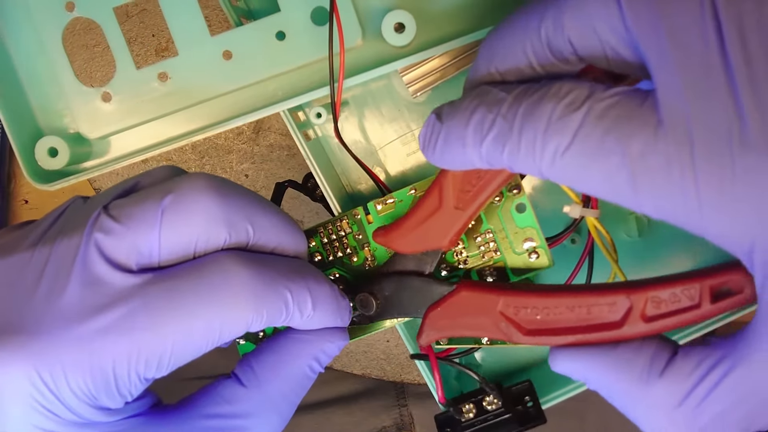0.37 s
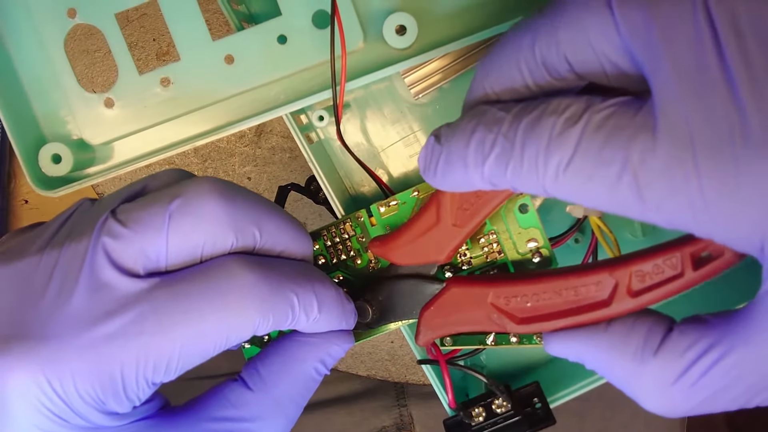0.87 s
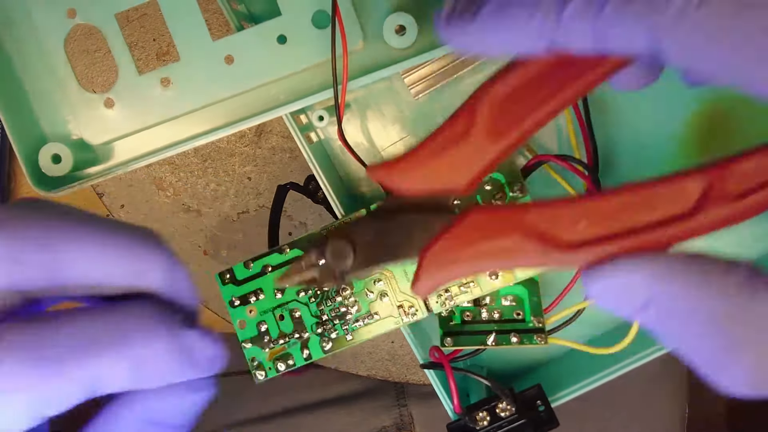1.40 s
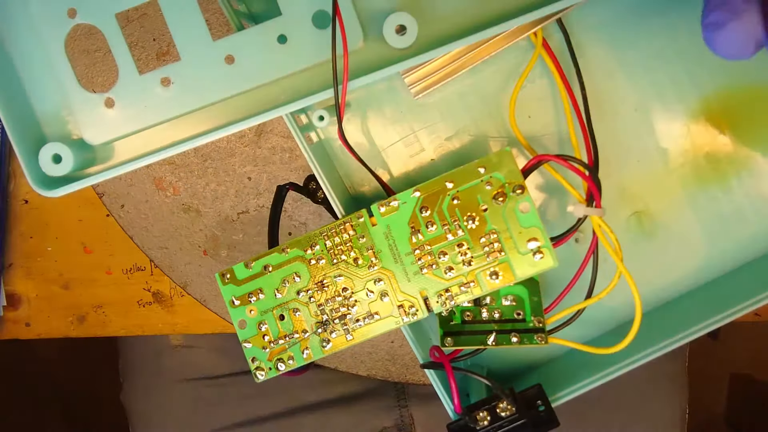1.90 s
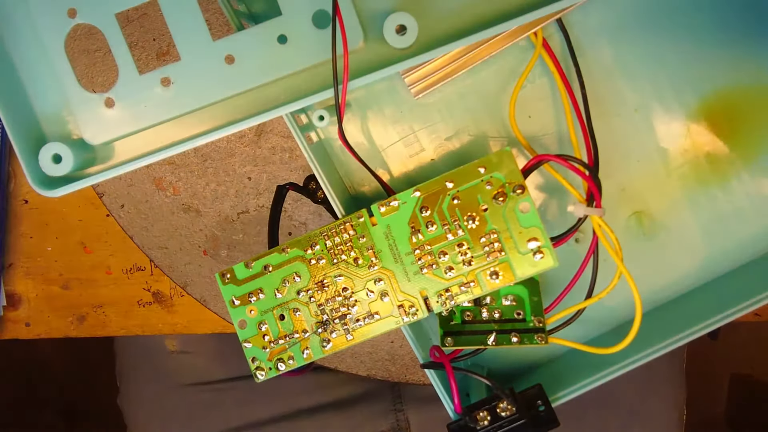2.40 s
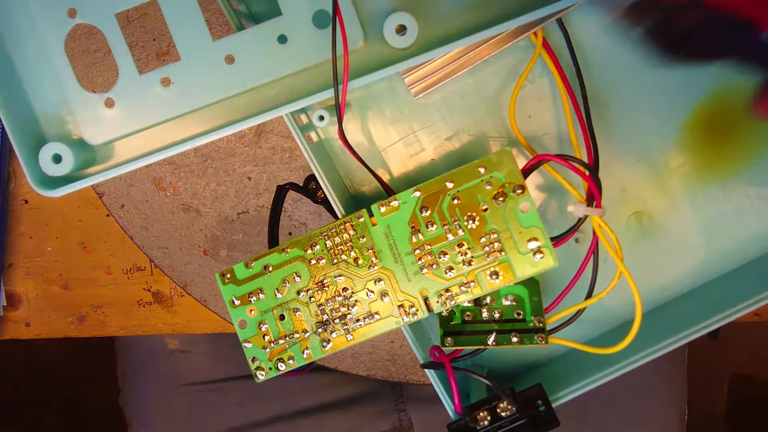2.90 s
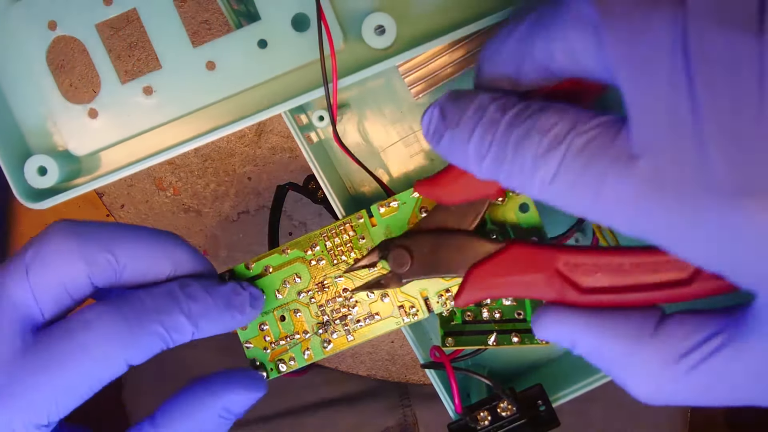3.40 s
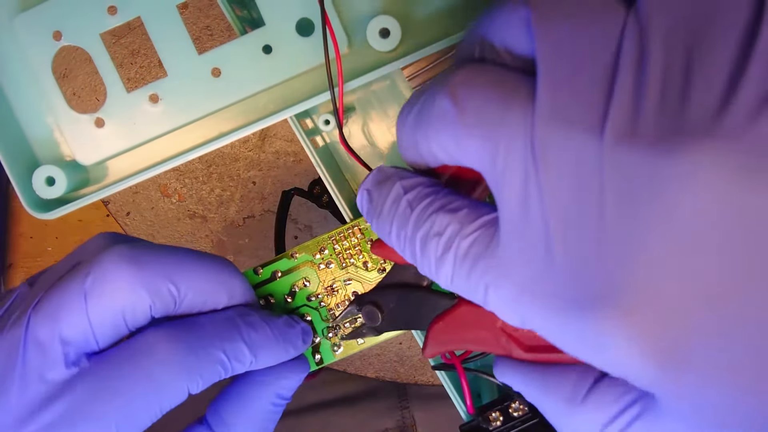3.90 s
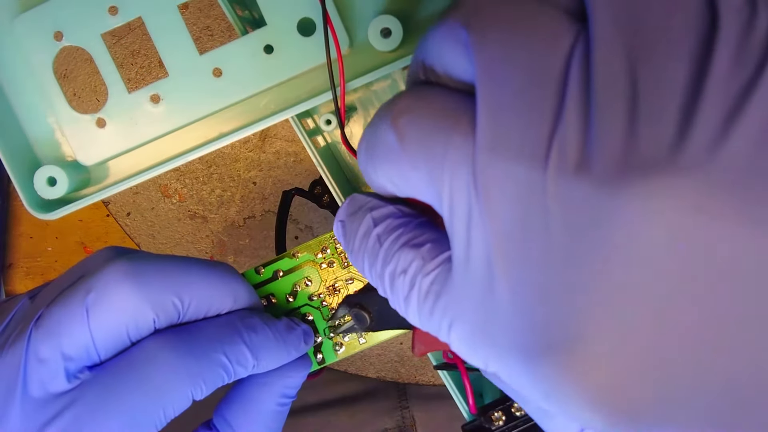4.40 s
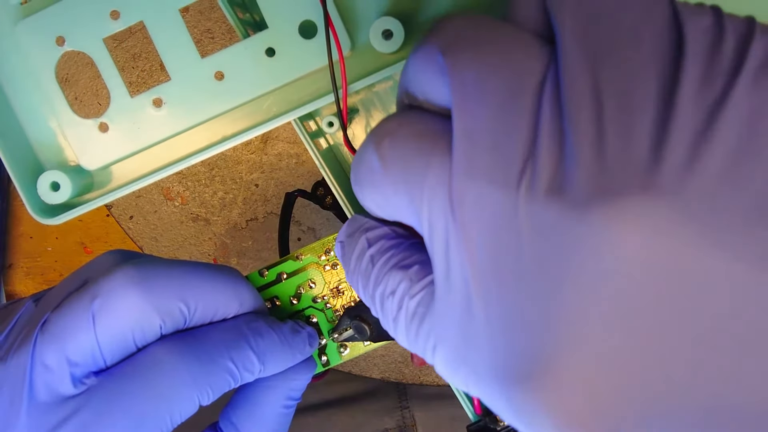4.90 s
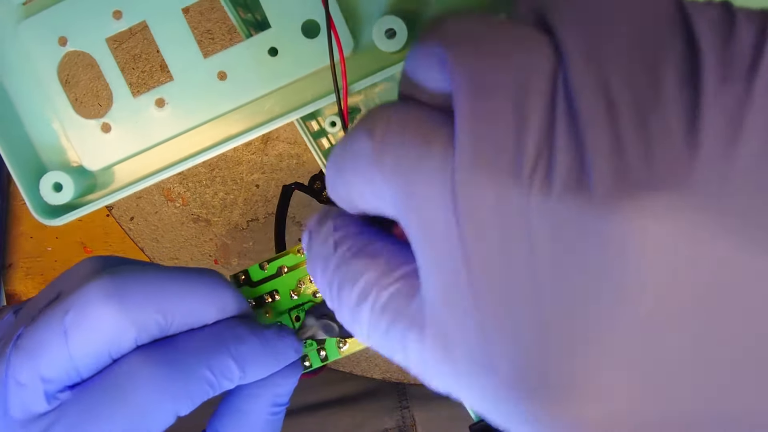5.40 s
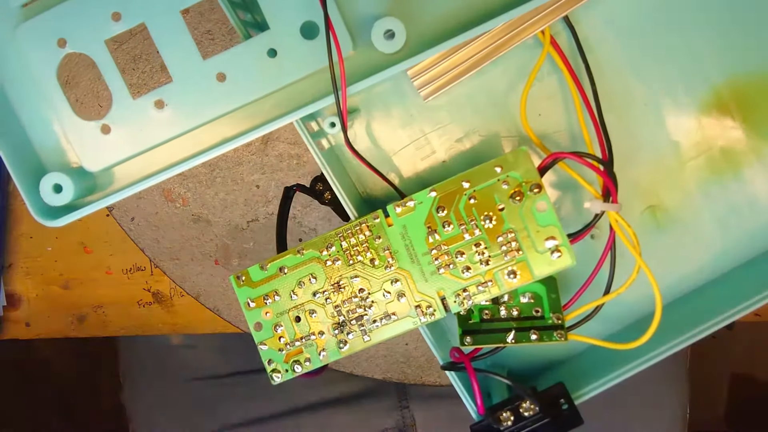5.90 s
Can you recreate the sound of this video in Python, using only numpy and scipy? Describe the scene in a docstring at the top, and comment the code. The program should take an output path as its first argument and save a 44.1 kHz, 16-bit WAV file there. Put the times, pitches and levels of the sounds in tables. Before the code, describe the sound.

Close workbench handling: sharp metallic snips, hollow plastic knocks, tiny ticks, a short stuttering drag with a squeak, then quiet before one last bright snip.

```python
"""Snipping wire leads on a circuit board

Small steel cutters snip wire leads on a circuit board lying in a plastic tray on a workbench. Each snip
or tap is a burst of noise that cracks and rings resonant modes of jaws, tray and bench, with a room echo.
Ticks, short friction, rustle and scuffing are shaped noise; a dragged object judders once in uneven slips.
The microphone mount sways in slow sines over bench rumble; behind lie still air, low hum and high tones."""
import sys
import numpy as np
from scipy import signal
from scipy.fft import rfft, irfft, next_fast_len
from scipy.io import wavfile
from scipy.ndimage import uniform_filter1d, map_coordinates

SR = 44100
rng = np.random.default_rng(int(sys.argv[2]) if len(sys.argv) > 2 else 0)


def decibels_to_gain(level_db):
    """Convert a level in decibels to a linear amplitude gain (20 dB per decade)."""
    exponent = np.asarray(level_db, float) / 20
    return 10 ** exponent


def inscribe(sig):
    """Save sig as 16-bit PCM at rate SR to the path in sys.argv[1].

    A 1-D sig is mono; a 2-D sig holds one channel per row.
    Samples are clipped to [-1, 1] before scaling.
    """
    pcm = np.round(np.clip(np.atleast_2d(sig).T, -1, 1) * 32767)
    wavfile.write(sys.argv[1], SR, pcm.astype(np.int16))


N = 266408  # samples


def unit(x):
    """Scales to rms 1."""
    return x / np.sqrt(np.mean(x ** 2) + 1e-20)


def peak(x):
    """Scales so that the loudest 12 ms have rms 1."""
    power = uniform_filter1d(np.mean(x ** 2, axis=0), size=512)
    return x / np.sqrt(power.max())


def along(points, hz):
    """Reads a curve of (Hz, value) points on a log frequency axis."""
    f, v = np.transpose(points)
    return np.interp(np.log(hz + 1), np.log(f + 1), v, right=v[-1])


def curves(rows):
    """Draws one value per sample for each column after the time."""
    s, *cols = np.transpose(rows)
    return [np.interp(np.arange(N) / SR, s, c) for c in cols]


def wobble(rate):
    """A smooth random curve with rate knots a second."""
    knots = rng.standard_normal(int(N * rate / SR) + 4)
    return map_coordinates(knots, [np.arange(N) * rate / SR])


def swell(s, db, rise, hold, fade_db_per_s):
    """A gain that rises from the moment s, holds and fades; rise and hold in seconds."""
    t = np.arange(N) / SR - s
    fade_db = fade_db_per_s * (t - rise - hold).clip(0)
    return decibels_to_gain(db - fade_db) * np.clip(t / rise, 0, 1) ** 2


def filtered(x, response):
    """Multiplies the spectrum of x by a complex response of frequency."""
    n = x.shape[-1]
    m = next_fast_len(n + 8192)  # padding lets the response die away
    return irfft(rfft(x, m) * response(np.fft.rfftfreq(m, 1 / SR)), m)[..., :n]


def soft(hz, edge_hz):
    """Response of a causal low-pass of four poles."""
    return 1 / (1 + 1j * hz / edge_hz) ** 4


def octave_band(hz, centre_hz, octaves):
    """Response of a bell-shaped band on a log frequency axis."""
    return np.exp(-.5 * (np.log2((hz + 1) / centre_hz) / octaves) ** 2)


def resonant(x, modes, scatter_db=0):
    """x rings a set of (Hz, width Hz, dB) modes of alternating sign, each at a slightly new strength."""
    gains = decibels_to_gain(scatter_db * rng.standard_normal(len(modes)))

    def response(f):
        total = 0
        for k, (c, w, db) in enumerate(modes):
            mode = 1j * f * w / (c * c - f * f + 1j * f * w)
            total = total + (-1) ** k * gains[k] * decibels_to_gain(db) * mode
        return total
    return filtered(x, response)


def rush(spectrum, alike, grainy_db=0):
    """Stereo noise of rms 1, partly alike at both microphones; quick random swells make it grainy."""
    common, own = rng.standard_normal(N), rng.standard_normal((2, N))
    pair = np.sqrt(alike) * common + np.sqrt(1 - alike) * own
    grains = decibels_to_gain(grainy_db * wobble(240))
    return unit(filtered(pair * grains, lambda hz: decibels_to_gain(along(spectrum, hz))))


def chatter(t, rise, t60, alike):
    """A contact is a short rattle of noise, partly the same at both microphones."""
    z = rng.standard_normal((3, len(t)))
    pair = np.sqrt(alike) * z[0] + np.sqrt(1 - alike) * z[1:]
    return pair * (1 - np.exp(-t / rise)) * decibels_to_gain(-60 * t / t60)


def echo(x):
    """The room's answer dies at its own speed in each band; a new noise tail each time."""
    # room decay: pitch_hz, t60_s
    room = [(200, 0.19), (1000, 0.14), (5000, 0.17), (14000, 0.23)]
    hz, t, z = signal.stft(rng.standard_normal((2, SR // 3)), SR, nperseg=256)
    decay = decibels_to_gain(-60 * t / along(room, hz)[:, None])
    tail = signal.istft(z * decay, SR, nperseg=256)[1]
    return signal.fftconvolve(x, tail / np.linalg.norm(tail[0]), axes=1)


def add(track, s, sound):
    """Mixes a stereo sound in at a time."""
    part = track[:, round(s * SR):][:, :sound.shape[1]]
    part += sound[:, :part.shape[1]]


def hits():
    """Each contact cracks and rings the jaws at once; tray and bench swell up a little later."""
    # resonances of the bench top: pitch_hz, width_hz, relative_level_db
    bench_modes = [(251.3, 21.4, -1.5), (382.9, 18, 2.5), (540.5, 15, -8.5), (300, 730, -15.5)]
    # resonances of tray and board: pitch_hz, width_hz, relative_level_db
    tray_modes = [(628.7, 12, -1), (789.4, 61, 1.5), (918, 38, -8), (1010, 59, -0.5), (1044.3, 42, 1.5),
                  (1218, 87, -3.5), (1330, 17, -8.5), (1601, 65, -0.5), (1800, 72, -9), (1836, 27, -5),
                  (2106, 180, -15), (2987, 56, -15), (1000, 1055, -7.5)]
    # resonances of the steel jaws pressed shut: pitch_hz, width_hz, relative_level_db
    jaw_modes = [(3980, 200, -10), (4640, 100, 6), (5060, 300, -12), (5600, 450, -12), (6530, 1100, -17),
                 (4300, 2600, -10)]
    # colour of the crack: pitch_hz, relative_level_db (per Hz)
    crack_spectrum = [(1180, -37), (2000, -5.5), (2160, -15), (3680, -4.5), (4690, -8), (7060, -10),
                      (14800, -28), (16000, -47)]
    # steel on board and tray, snips the loudest:
    # contact_s, tray_peak_db, low_knock_db, jaw_ring_db, crack_db
    steel_hits = [(0.092, -50, -60, -72.5, -99), (0.274, -46.5, -49.5, -60.5, -66.5),
                  (0.446, -53.5, -62, -64.5, -84), (1.13, -42, -51.5, -44.5, -57.5),
                  (1.261, -45, -58, -57.5, -65), (1.329, -35, -44.5, -42, -66),
                  (1.834, -70, -64, -67.5, -64), (1.861, -64, -59.5, -73, -85),
                  (2.842, -68, -75, -53.5, -56), (3.082, -32.5, -51.5, -47.5, -52),
                  (3.268, -59.5, -78, -70, -93), (3.316, -52, -80, -64, -89),
                  (3.669, -79.5, -83, -68, -103), (3.714, -70, -70, -80, -93), (3.732, -58, -64, -67, -98),
                  (4.887, -57.5, -65.5, -75, -83), (5.2994, -34.5, -46.5, -35, -42),
                  (5.442, -60, -70.5, -80, -92)]
    # fingertips on board and tray: contact_s, tray_peak_db, low_knock_db, spot_hz (where the tray answers most)
    finger_taps = [(0.048, -79, -70, 1220), (0.169, -56, -66.5, 850), (0.379, -61.5, -66.5, 960),
                   (0.518, -56.5, -68, 824), (0.548, -69, -82, 1000), (0.861, -65.5, -71.5, 1010),
                   (0.927, -75.5, -84, 1010), (0.979, -67, -91, 1000), (1.04, -71.5, -65, 950),
                   (3.496, -71.5, -91, 1000), (3.814, -86.5, -73, 1152), (4.026, -54.5, -61, 1220),
                   (4.111, -71.5, -85, 1010), (4.251, -68.5, -72.5, 1010), (4.31, -65, -68.5, 1000),
                   (4.633, -64.5, -65, 1010), (4.813, -68.5, -71, 967), (5.224, -68.5, -96, 1020)]
    # left-right balance of the hits by pitch: pitch_hz, left_minus_right_db
    balance = [(60, 3), (200, -2.5), (600, 7.5), (1300, 4.5), (2400, -5.5), (4500, -8.5), (9000, 3),
               (15000, 1.5)]
    full_snip_db = -52  # jaw ring above this is a full snip
    finger_db = -20  # jaw ring this far under the tray or further marks a soft contact
    loose_pitch = 1.065  # loose jaws ring this much higher

    contacts = [(*row, 1200) for row in steel_hits]  # Hz where the tray answers the tool most
    for s, db, low_db, spot_hz in finger_taps:
        # a tap also shakes a little ring and crack out of the held tool
        contacts.append((s, db, low_db, db - 27.5, db - 26.5, spot_hz))
    out, t = np.zeros((2, N)), np.arange(SR // 4) / SR
    for s, tray_db, knock_db, jaw_db, crack_db, spot_hz in contacts:
        # modes near the spot answer, fewer under a finger
        narrowing_db = 5 if jaw_db > tray_db + finger_db else 12
        struck = [(hz, w, db - narrowing_db * min(np.log2(hz / spot_hz) ** 2, 1.5))
                  for hz, w, db in tray_modes]
        # only full snips close the jaws
        jaw_state = np.array(jaw_modes) * [1 if jaw_db > full_snip_db else loose_pitch, 1, 1]
        # 0 is a fingertip, 1 is steel on the board
        hard = np.clip((jaw_db - tray_db + 25) / 24, 0, 1)
        edge_hz = 3200 + 5500 * hard  # soft contacts are dull

        knock = resonant(chatter(t, 0.0029, 0.093, 0.91), bench_modes, scatter_db=4.0)
        tray = resonant(chatter(t, 0.0011, .095 - 0.027 * hard, 0.55), struck, scatter_db=4.0)
        knock = peak(filtered(knock, lambda hz: soft(hz, edge_hz)))
        tray = peak(filtered(tray, lambda hz: soft(hz, edge_hz)))
        jaws = peak(resonant(chatter(t, 0.00015, 0.057, 0.042), jaw_state, scatter_db=0.83))
        crack = chatter(t, 0.00026, 0.11, 0.26)
        crack = peak(filtered(crack, lambda hz: decibels_to_gain(along(crack_spectrum, hz))))

        dry = decibels_to_gain(knock_db) * knock + decibels_to_gain(tray_db - 3.0) * tray  # the tray's rms sits 3 dB under its table level
        dry = dry + decibels_to_gain(jaw_db) * jaws + decibels_to_gain(crack_db) * crack
        add(out, s - .0005, dry)
        add(out, s + .004, decibels_to_gain(-10) * echo(dry))
    sides = np.array([[.5], [-.5]])
    return filtered(out, lambda hz: decibels_to_gain(sides * along(balance, hz)))


def ticks():
    """Each tiny tick of glove, wire or tool is a few milliseconds of bright noise."""
    # ticks: start_s, peak_db (12.5 dB over the rms of the first 4 ms), centre_hz, left_minus_right_db
    tick_rows = [(0.0209, -73, 2570, -14), (0.8915, -61, 3850, -2), (0.9386, -67, 3990, 0),
                 (0.9733, -67, 3880, -6), (1.2171, -53, 5030, -2), (1.427, -59, 2900, -9),
                 (1.5015, -50, 2690, -4.5), (1.5638, -53, 4850, 13), (1.5767, -56, 4870, 21),
                 (1.585, -60, 6430, 23), (1.5948, -47.5, 4720, 1), (1.6032, -49, 5200, -7),
                 (1.8362, -48, 2630, 11), (1.899, -54, 2650, -1), (2.109, -62, 6530, 8),
                 (2.4808, -68.5, 6880, -14), (2.6894, -69.5, 5700, -19), (2.978, -61, 6420, 2),
                 (2.9947, -55, 6900, -8), (3.0455, -57, 4860, -15), (3.1894, -61, 5000, -10),
                 (3.2727, -57.5, 3160, -10), (3.5233, -65, 4700, 7), (3.9586, -69, 4500, -8),
                 (4.354, -67, 3540, -6), (4.4543, -70, 3470, -5), (4.9782, -71, 4500, 10),
                 (4.9949, -69.5, 4915, -6), (5.0296, -71, 2675, -14), (5.1394, -71, 2500, -9),
                 (5.5004, -61, 4482, -19), (5.5308, -63, 5030, -19), (5.5583, -64, 3150, -2),
                 (5.7344, -63, 4826, 3)]
    out, t = np.zeros((2, N)), np.arange(SR // 40) / SR
    for s, db, centre_hz, pan_db in tick_rows:
        tick = filtered(chatter(t, 0.00044, 0.0072, 0.72), lambda hz: octave_band(hz, centre_hz, .36))
        dry = decibels_to_gain(db - 12.5) * tick / tick[:, :SR // 250].std()
        dry = dry * decibels_to_gain(np.array([[pan_db], [-pan_db]]) / 2)
        add(out, s, dry)
        add(out, s + 0.0035, decibels_to_gain(-12) * echo(dry))
    return out


def short_bands():
    """Each short band of uneven noise starts quickly and fades, as friction or as a ringing tray."""
    # short bands of friction noise, and the tray ringing on after a hit:
    # start_s, length_s, level_db (before the fade), centre_hz, width_octaves
    band_rows = [(0.607, 0.14, -65.5, 840, 0.76), (1.303, 0.023, -53, 1000, 0.23),
                 (1.572, 0.084, -67.5, 5460, 0.74), (1.697, 0.093, -64, 3700, 0.96),
                 (1.81, 0.071, -63.5, 5000, 0.76), (1.887, 0.045, -60.5, 7000, 0.74),
                 (2.021, 0.18, -72, 4940, 0.81), (2.244, 0.19, -76, 4000, 0.7),
                 (2.658, 0.088, -75.5, 5400, 1), (2.664, 0.043, -68, 300, 0.63),
                 (2.767, 0.093, -78.5, 5550, 0.83), (2.846, 0.077, -62.5, 4800, 0.96),
                 (2.853, 0.21, -78, 2160, 0.095), (2.998, 0.044, -68, 6000, 0.74),
                 (3.04, 0.045, -61, 4000, 0.85), (3.095, 0.17, -60, 969, .25), (3.25, .11, -63, 1000, 0.33),
                 (3.585, 0.042, -72, 5250, 0.27), (3.602, 0.12, -77, 4850, 0.17),
                 (5.135, 0.048, -77.5, 1055, .6), (5.253, 0.047, -71.5, 4830, 0.37),
                 (5.274, 0.02, -53.5, 900, 0.56), (5.498, .09, -65.5, 3240, 0.85),
                 (5.668, 0.068, -76.5, 5100, 0.18), (5.722, 0.04, -74, 4970, 0.13)]
    out = np.zeros((2, N))
    for s, length, db, centre_hz, octaves in band_rows:
        u = np.arange(round(length * SR)) / (length * SR)  # 0 to 1 through the sound
        # uneven level, 150 knots a second
        uneven = decibels_to_gain(2.2 * map_coordinates(rng.standard_normal(99), [u * length * 150]))
        noise = rng.standard_normal((2, len(u))) + 0.28 * rng.standard_normal(len(u))
        noise = unit(filtered(noise * uneven, lambda hz: octave_band(hz, centre_hz, octaves)))
        rise, release = np.clip(u / .14, 0, 1), np.clip((1 - u) / 0.32, 0, 1)  # shares of the length
        dry = decibels_to_gain(db - 8.8 * u) * noise * rise * release
        add(out, s, dry)
        add(out, s + .004, decibels_to_gain(-8.5) * echo(dry))
    return out


def rustle_and_scuffing():
    """Gloves and sleeves hiss in grains of noise; lower noise carries scuffing and the hits' ringing tails."""
    # levels of rustle and low scuffing, with the hits' ringing tails:
    # time_s, rustle_db, scuff_db (both before a 3 dB cut and random swells)
    levels = [(0.0, -81, -75), (0.15, -79, -71), (0.3, -90.5, -78), (0.7, -85.5, -68.5),
              (1.11, -87.5, -79.5), (1.18, -68.5, -61.5), (1.3, -71, -59), (1.39, -73.5, -75),
              (1.8, -67, -74), (1.97, -66, -55), (2.1, -71.5, -64), (2.24, -76, -71), (2.65, -87, -81.5),
              (2.85, -75.5, -85.5), (3.06, -74, -80), (3.15, -72, -67), (3.43, -82, -81.5),
              (4.1, -91, -82.5), (4.45, -90.5, -75), (4.8, -94.5, -84.5), (5.2, -85, -72.5),
              (5.32, -70, -66), (5.62, -79, -73.5), (6.04, -90, -95.5)]
    # colour of the rustle: pitch_hz, relative_level_db (per Hz)
    rustle_spectrum = [(880, -42.5), (1500, -6.5), (2250, -9), (2720, -12), (2880, -6.5), (3220, -11),
                       (4330, -4), (5770, -9), (6760, -9.5), (8000, -24.5), (10900, -19.5), (13900, -27.5),
                       (16000, -33.5)]
    # colour of the low scuffing: pitch_hz, relative_level_db (per Hz)
    scuff_spectrum = [(76, -37.5), (130, -4.5), (326, -12.5), (382, -1), (447, -10.5), (786, -13),
                      (908, -17), (1020, -14.5), (2370, -25.5), (3000, -41), (3900, -54.5), (6600, -120)]
    rustle_db, scuff_db = curves(levels)
    rustle_gain = decibels_to_gain(rustle_db - 3 + 3.06 * wobble(40))
    rustle = rustle_gain * rush(rustle_spectrum, 0.033, grainy_db=2.0)
    scuff_gain = decibels_to_gain(scuff_db - 3.0 + 2.83 * wobble(25))
    scuff = scuff_gain * rush(scuff_spectrum, 0.69, grainy_db=2.5)
    return rustle + scuff


def judder():
    """A dragged object sticks and slips unevenly, slower at the end, and squeaks on the right."""
    # resonances of the dragged object: pitch_hz, width_hz, relative_level_db
    dragged_modes = [(94, 66, 2.5), (227, 122, -6), (366, 29, -5.5), (802, 43, -9), (1070, 160, -13),
                     (1390, 82, -44)]
    # resonances of the squeak: pitch_hz, width_hz, relative_level_db
    squeak_modes = [(2643, 91, -2), (4360, 58, -12.5), (5020, 57, -10.5)]
    # squeaks: start_s, level_db (before flutter and pan), hold_s
    squeak_rows = [(1.885, -59, .012), (1.924, -61.5, 0.023), (1.985, -74.5, .03)]
    start_s, rise_s, slowing_s = 1.865, .045, 0.0281  # the last is a time constant
    start_rate, end_rate = 140, 88  # slips per second
    one_slip_s = 1.938  # the slip count is set so that one slip falls about here

    since = (np.arange(N) / SR - start_s - rise_s / 2).clip(0)
    rate = end_rate + (start_rate - end_rate) * np.exp(-since / slowing_s)
    turns = np.cumsum(rate) / SR
    turns = turns - turns[round(one_slip_s * SR)] + 0.061 * wobble(90)
    # one click at each whole turn, of uneven strength
    slips = np.diff(np.floor(turns), prepend=0).clip(0, 1) * decibels_to_gain(1.2 * wobble(100))
    rough = filtered(slips, lambda hz: soft(hz, edge_hz=2900)) + 0.018 * rng.standard_normal(N)

    squeak_gain = sum(swell(s, db, 0.016, hold, 500) for s, db, hold in squeak_rows)
    squeak = unit(resonant(rng.standard_normal((2, N)), squeak_modes))
    squeak = squeak * squeak_gain * decibels_to_gain(0.83 * wobble(77)) * decibels_to_gain([[-4], [3]])  # left, right dB
    # swells, holds and stops short
    drag_gain = swell(start_s, -42.5, rise_s, hold=0.056, fade_db_per_s=1800)
    return drag_gain * unit(resonant(rough, dragged_modes)) + squeak


def mount():
    """Shakes set the microphone mount swaying and shivering in sines; the bench rumbles and passes on bumps."""
    # shakes about every half second: start_s, sway_db (before swells and pan), hold_s, sway_hz, shiver_hz
    shakes = [(0.0, -42, 0.12, 13, 23.1), (0.588, -44.5, 0.25, 10.8, 26.1), (1.118, -41, 0.14, 13.6, 24.5),
              (1.688, -53, 0.29, 13, 24.6), (2.198, -49.5, 0.24, 14.2, 24.3),
              (2.862, -59, 0.11, 11.5, 24.8), (3.349, -71, 0.18, 13.6, 25.35),
              (3.98, -55.5, 0.067, 8.3, 28.4), (4.422, -54, 0.17, 9, 28.34), (5.0, -52, 0.16, 8.3, 27.9),
              (5.499, -54.5, 0.15, 9.8, 26.6), (5.8, -68, 0.051, 8.7, 25)]
    # single bumps through the bench: peak_s, level_db
    bump_rows = [(0.066, -67), (0.21, -57), (0.802, -61), (0.87, -66), (1.197, -43.5), (1.346, -50),
                 (1.708, -56), (1.77, -66), (1.86, -53), (2.141, -55.5), (2.29, -51.5), (2.68, -60),
                 (2.81, -65.5), (3.02, -64.5), (4.11, -67.5), (5.17, -65), (5.32, -62), (5.63, -71)]
    # colour of bench rumble and bumps: pitch_hz, relative_level_db (per Hz)
    thud_spectrum = [(20, -120), (32, -25), (42, 7.5), (70, 1.5), (110, -5.5), (170, -15.5), (260, -27),
                     (500, -120)]
    bump_rise_s = .03

    t, low, shaking = np.arange(N) / SR, 0, 0
    for s, db, hold, sway_hz, shiver_hz in shakes:
        gain = swell(s, db, 0.033, hold, 124.5)
        shiver_db = -24.5 if s < 3.9 else -8.5  # under the sway; stronger from 3.9 s on
        shiver = decibels_to_gain(shiver_db) * np.sin(2 * np.pi * shiver_hz * (t - s)) * decibels_to_gain(3.6 * wobble(9))
        sway = np.sin(2 * np.pi * sway_hz * (t - s))
        low = low + np.sqrt(2) * gain * (sway + shiver)
        shaking = shaking + gain
    pan_db = -6 + 3 * wobble(13)  # left minus right
    low = low * decibels_to_gain(1.5 * wobble(5.4)) * decibels_to_gain([pan_db / 2, -pan_db / 2])

    bumps = sum(swell(s - bump_rise_s, db, bump_rise_s, 0, 328.5) for s, db in bump_rows)
    # rumble 18 dB under the sway, over a low floor
    rumble = (decibels_to_gain(-18) * shaking + decibels_to_gain(-81)) * decibels_to_gain(3 * wobble(19))
    return low + (rumble + bumps) * rush(thud_spectrum, 0.84)


def room_tone():
    """Still air as shaped noise; a low hum and faint high tones that come and go as sines."""
    # colour of the air: pitch_hz, relative_level_db (per Hz)
    air_spectrum = [(15, -29), (25, -1), (76, -21.5), (200, -36), (256, -22.5), (560, -31.5), (1040, -36),
                    (1130, -36.5), (1370, -42), (1700, -31), (2480, -46), (3520, -40), (4610, -42.5),
                    (7310, -53.5), (16000, -44)]
    # changing levels of the low hum and high tones: time_s, hum_db, high_tone_db, higher_tone_db
    tone_levels = [(0.0, -73, -107, -100), (1.2, -70.5, -107, -101), (1.85, -72.5, -93.5, -101),
                   (2.6, -79, -109, -108), (3.05, -72, -102, -105), (3.5, -79.5, -114, -112),
                   (5.0, -76, -115, -113), (5.3, -71, -108, -111), (6.04, -79, -115, -115)]
    # their pitches: hum_hz, high_tone_hz, higher_tone_hz
    tone_pitches = [59.5, 8382, 14142]
    t, lines = np.arange(N) / SR, 0
    for hz, db in zip(tone_pitches, curves(tone_levels)):
        lines = lines + decibels_to_gain(db + 0.51 * wobble(3)) * np.sqrt(2) * np.sin(2 * np.pi * hz * t)
    return decibels_to_gain(-79) * rush(air_spectrum, 0.1) + lines


def scene():
    """All sources at the two microphones."""
    return hits() + ticks() + short_bands() + rustle_and_scuffing() + judder() + mount() + room_tone()


def band_limit(x):
    """A steep low-pass at the top of the band."""
    return signal.sosfilt(signal.butter(12, 16470, fs=SR, output="sos"), x)


def record(dry):
    """The bench is nearer the left microphone, which hears it first."""
    lead_s = 0.00015
    sides = np.array([[1], [-1]])  # half the lead early on the left, half late on the right
    heard = filtered(dry, lambda hz: np.exp(1j * np.pi * hz * lead_s * sides))
    return band_limit(heard)


dry = scene()
out = record(dry)
inscribe(out)
```